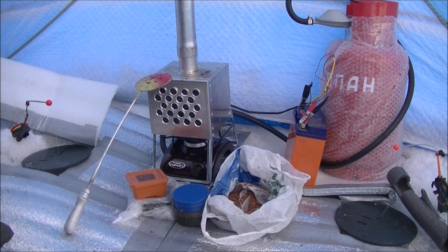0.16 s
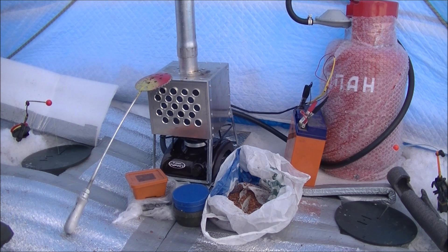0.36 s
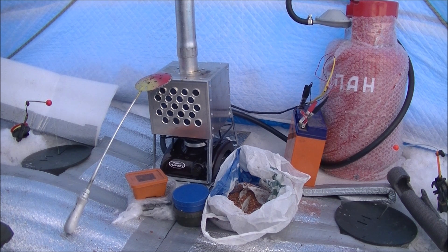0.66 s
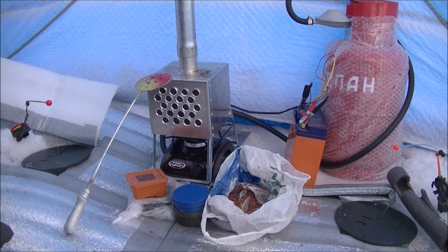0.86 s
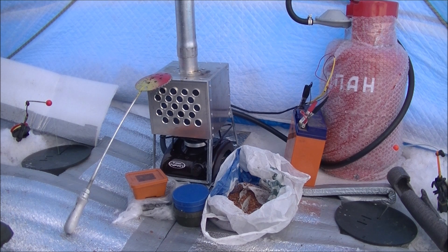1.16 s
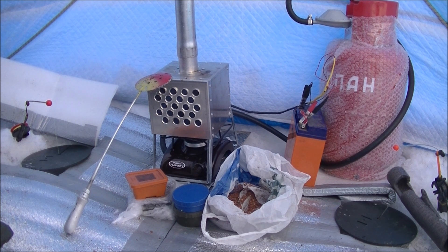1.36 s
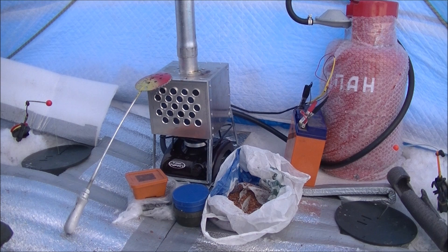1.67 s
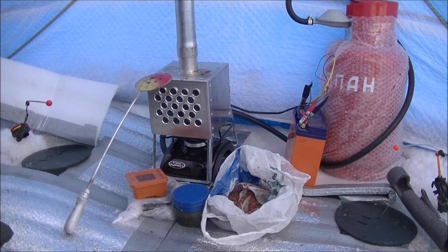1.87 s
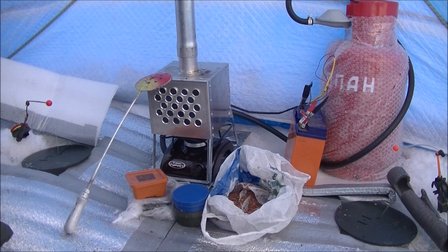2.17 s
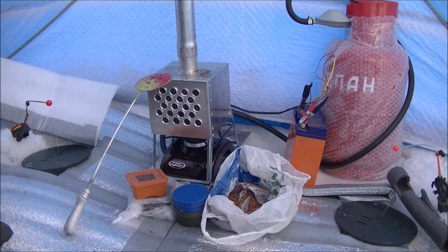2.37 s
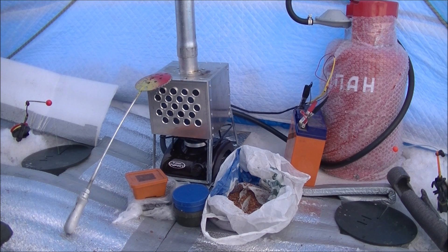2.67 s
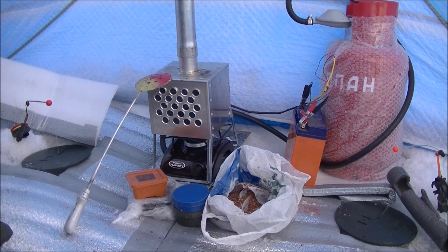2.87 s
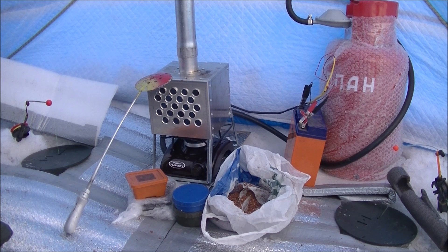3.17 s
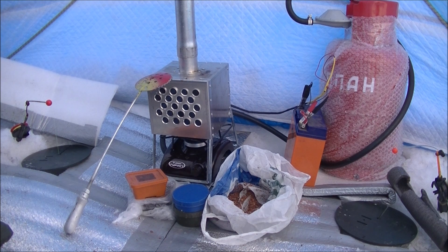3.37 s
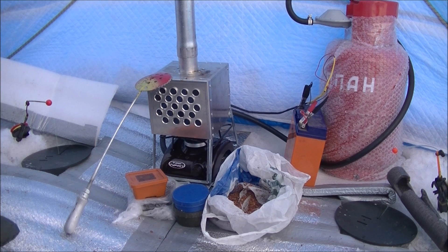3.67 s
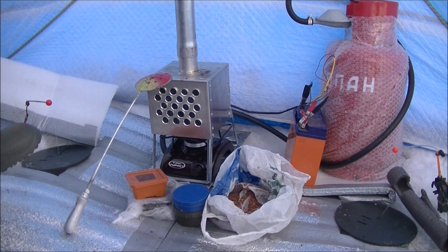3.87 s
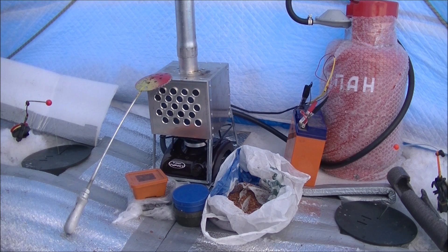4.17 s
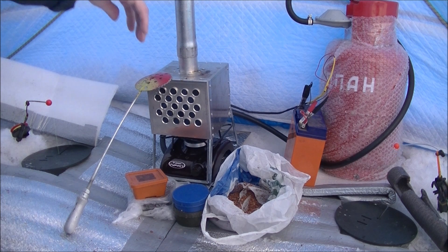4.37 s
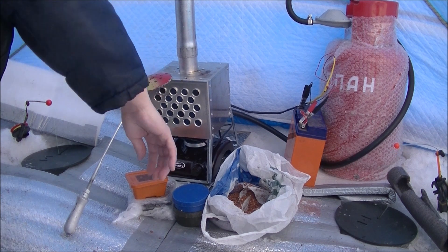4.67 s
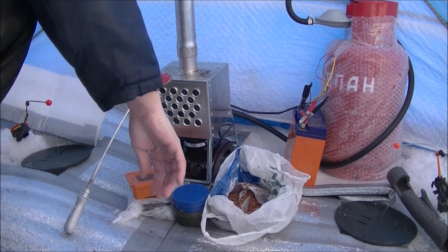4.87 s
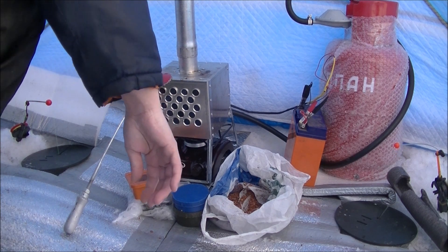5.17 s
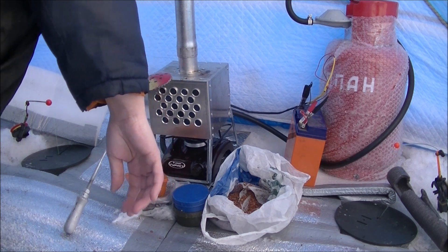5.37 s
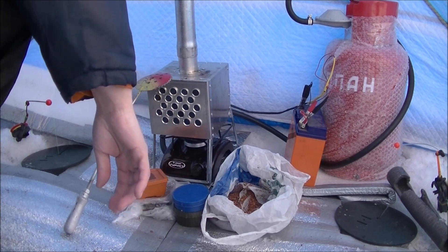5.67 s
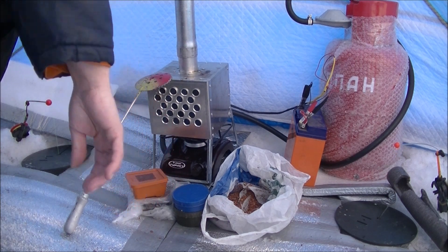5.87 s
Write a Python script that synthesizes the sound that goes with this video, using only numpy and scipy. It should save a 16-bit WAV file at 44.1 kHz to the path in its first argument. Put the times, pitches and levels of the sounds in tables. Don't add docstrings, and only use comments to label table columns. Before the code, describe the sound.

Close stereo camera microphones, very dry with a tiny diffuse tail. A faint gas hiss with a thin high whistle stays constant. Over it, slick jacket fabric rubs and ticks in quick small strokes, with a rapid little metal rattle early on and a hard snap before the middle. Then a broad sleeve movement rises, crackling, with dull low thuds on the floor mat, and fades into sparse rustles.

```python
import sys
import numpy as np
from scipy import signal
from scipy.fft import rfft, irfft
from scipy.io import wavfile
from scipy.ndimage import uniform_filter1d

SR = 44100
rng = np.random.default_rng(int(sys.argv[2]) if len(sys.argv) > 2 else 0)


def nominal_scale(level):
    x = np.asarray(level, float) / 20
    return 10 ** x


def transcribe(u):
    v = np.clip(np.atleast_2d(u).T, -1, 1)
    q = np.round(v * 32767).astype(np.int16)
    wavfile.write(sys.argv[1], SR, q)


N = 265482
TIME = np.arange(N) / SR
FRAMES = TIME[::16]

# frequency in Hz, density in dB per Hz.
NYLON = [(400, -14), (680, -23), (828, -17.5), (1200, -16.5), (1600, -10.5), (1730, -9.5), (2590, 0),
         (2880, -1), (3750, 1.5), (4380, 0.5), (5130, 0.5), (7030, -6), (9390, -4), (13700, -25),
         (15700, -16)]


def evened(x):
    return x / np.sqrt(np.mean(x ** 2) + 1e-20)


def read(points, hz):
    f, value = np.transpose(points)
    return np.interp(np.log(hz + 1), np.log(f + 1), value)


def coloured(x, points):
    gain = nominal_scale(read(points, np.fft.rfftfreq(len(x), 1 / SR)))
    return irfft(rfft(x) * gain, len(x))


def resonate(x, hz, width):
    r = np.exp(-np.pi * width / SR)
    if np.ndim(hz) == 0:
        return 2 * signal.lfilter([1 - r], [1, -r * np.exp(2j * np.pi * hz / SR)], x).real
    turn = np.exp(2j * np.pi * np.cumsum(hz) / SR)
    return 2 * (turn * signal.lfilter([1 - r], [1, -r], x / turn)).real


def band(x, lo_hz, hi_hz):
    return signal.sosfilt(signal.butter(3, [lo_hz, hi_hz], "band", fs=SR, output="sos"), x)


def add(mix, s, sound):
    part = mix[round(s * SR):][:len(sound)]
    part += sound[:len(part)]


def slips(count, per_s, spread_db):
    size = nominal_scale(spread_db * np.minimum(rng.exponential(1, count), 5))
    sign = rng.choice([-1., 1.], count)
    return evened(size * sign * (rng.random(count) < per_s / SR))


def lumps(seconds, depth_db):
    return nominal_scale(depth_db * evened(uniform_filter1d(rng.standard_normal(N), round(seconds * SR))))


def swell(s, peak_db, rise, fall, bend=0.96):
    before, after = (s - FRAMES) / max(rise, .005), (FRAMES - s) / max(fall, .005)
    return nominal_scale(peak_db - 20 * np.maximum(before, after) ** bend) ** 2


def burner():
    # frequency in Hz, density in dB per Hz.
    hiss_spectrum = [(15, -77), (25, -56), (75, -10), (189, -2.5), (228, -0.5), (380, -5.5), (652, -12.5),
                     (766, -12.5), (1240, -14.5), (1390, -10.5), (2790, -5.5), (3030, -4), (3370, 0),
                     (6440, -10.5), (15700, -16)]
    # frequency in Hz, side minus mid in dB.
    hiss_width = [(60, -3), (150, 0), (600, -3.5), (2000, -4.5), (3300, -1), (4100, -9), (4900, 0),
                  (5700, 4), (6600, -1), (7600, -1), (11000, -1.5), (15000, 0.5)]
    hiss_db = -66.5
    mid, side = (nominal_scale(hiss_db) * evened(coloured(rng.standard_normal(N), hiss_spectrum)) for _ in "ms")
    whistle = np.sin(2 * np.pi * np.cumsum(3312 * lumps(.2, .012)) / SR)
    mid = mid + nominal_scale(hiss_db - 5.5) * lumps(.3, 1.8) * whistle
    side = coloured(side, hiss_width)
    return np.array([mid + side, mid - side]) * lumps(0.043, 0.42)


def motion():
    # time in seconds, level in dB, tautness from -1 slack to 1 tight.
    drag = [(0, -64, -0.037), (.5, -66.5, -0.61), (.62, -61, 0), (.97, -63.5, -0.027), (1.3, -60, 0.15),
            (1.55, -62, 0.67), (1.72, -57.5, 0.27), (2.03, -62.5, -0.31), (2.34, -66.5, 0.11),
            (2.62, -88, 0), (2.87, -63.5, -0.011), (3.39, -71.5, 0.14), (3.48, -55, -0.071),
            (4.25, -47, -0.063), (5.0, -54.5, 0.42), (5.74, -62.5, 0.12), (5.9, -54.5, -0.053),
            (6.02, -55.5, -0.097)]
    # peak in seconds, peak in dB, rise in seconds, fall in seconds, tautness.
    fidgets = [(1.05, -51.5, 0.2, 0.2, 0.3), (1.2, -54, 0.33, 0.19, -.3), (1.4, -54, 0.067, 0.16, -0.7),
               (1.889, -43, 0.088, 0.069, 0.35), (1.83, -52, 0.053, 0.17, 0.31),
               (1.92, -53, 0.18, 0.028, .3), (2.205, -52.5, .15, 0.088, 0.26),
               (2.682, -54.5, 0.027, 0.13, 0.6), (2.74, -53.5, 0.14, .05, .5),
               (2.165, -43, 0.044, 0.095, 0.39), (2.425, -51, 0.015, 0.31, 0.0057),
               (2.483, -49.5, 0.092, 0.044, -0.24), (2.7, -48.5, 0.042, 0.14, 0.73),
               (2.781, -51, 0.11, 0.026, -1.3), (2.98, -50.5, 0.024, 0.14, 0.46),
               (3.04, -54.5, 0.17, 0.031, 0.12), (3.108, -58, 0.053, .17, -0.99)]
    # peak in seconds, peak in dB, rise in seconds, fall in seconds, tautness.
    reaches = [(3.66, -44.5, 0.027, 0.45, -0.35), (3.792, -39.5, 0.23, 0.26, 0.56),
               (3.88, -45.5, 0.18, 0.32, -0.58), (4.04, -41, 0.15, 0.086, 1),
               (4.12, -34, 0.25, 0.015, 0.47), (4.33, -37, 0.03, 0.11, -0.2),
               (4.415, -42.5, 0.15, 0.22, -0.3), (4.48, -40.5, 0.22, 0.34, 0.29), (4.3, -44, .03, .2, .3),
               (4.58, -47, .15, 0.14, 0.075), (4.67, -44, 0.076, 0.68, -0.43),
               (4.85, -41, 0.39, 0.32, 0.22), (5.0, -48.5, 0.22, 0.15, 0.0036),
               (5.055, -51, 0.3, 0.056, 0.2), (5.16, -59.5, 0.1, 0.15, 0.5), (5.3, -51.5, 0.09, 0.14, 0.1),
               (5.39, -53.5, .05, .2, .3), (5.5, -53, 0.17, .08, .3), (5.45, -48.5, 0.21, .25, 0.47),
               (5.63, -56, 0.22, .1, 0.25), (6.03, -46, .08, .1, 0.066)]
    s, level_db, taut = np.transpose(drag)
    power = nominal_scale(np.interp(FRAMES, s, level_db)) ** 2
    pull = power * np.interp(FRAMES, s, taut)
    for *push, tight in [*fidgets, *reaches]:
        stroke = swell(*push)
        power, pull = power + stroke, pull + tight * stroke
    return np.interp(TIME, FRAMES, np.sqrt(power)), np.interp(TIME, FRAMES, pull / power)


def crackle(count=8):
    out, u = np.zeros(N), TIME[:200]
    for hz in np.geomspace(2000, 7000, count):
        pop = np.exp(-u * hz / 0.91) * np.minimum(u * hz, 1) * np.sin(2 * np.pi * hz * u)
        pops = signal.oaconvolve(slips(N, 90, 2.7), pop / np.linalg.norm(pop))[:N]
        out += nominal_scale(read(NYLON, hz)) * pops
    return evened(out)


def rubbing():
    # start in seconds, end in seconds, frequency in Hz, width in Hz, level in dB.
    singing = [(3.7, 3.78, 2450, 370, -46), (3.78, 3.85, 2530, 370, -46.5), (3.71, 3.84, 3850, 600, -42),
               (5.135, 5.2, 4950, 450, -50.5), (5.38, 5.54, 4900, 590, -48.5), (5.38, 5.52, 7600, 410, -61),
               (4.0, 4.1, 940, 490, -55.5), (4.0, 4.125, 9300, 790, -47.5), (4.325, 4.37, 2800, 700, -44),
               (4.395, 4.43, 1900, 600, -52), (1.5, 1.76, 13500, 3000, -72), (4.04, 4.13, 4670, 910, -43.5),
               (1.85, 1.93, 2750, 410, -54), (1.86, 1.91, 4300, 820, -46.5), (3.0, 3.058, 2950, 320, -59),
               (3.1, 3.145, 2900, 400, -61), (2.15, 2.22, 4660, 800, -50), (3.862, 3.892, 9000, 1300, -46),
               (4.56, 4.61, 3600, 540, -53), (5.55, 5.64, 4750, 700, -58), (2.675, 2.725, 4900, 800, -57)]
    level, taut = motion()
    sheen_db, fold_db = -11.5 + 5 * taut, -15 - 8 * taut
    patch_hz, lining_db = 4230 + 600 * taut, -1.5 - 3.5 * taut

    cloth = coloured(slips(N, 9000, 0.75) * lumps(.004, 0.16) * lumps(0.031, 1.38), NYLON)
    body = band(cloth, 1900, 7200)
    body = evened(evened(body) + 2.4 * evened(resonate(body, patch_hz, 1740)))
    lining = resonate(band(body, 1500, 3000), 2400, 1100)
    body = body + (nominal_scale(lining_db) * lumps(.04, 2.2) - 1) * lining
    sheen = band(cloth, 7000, 15900)
    sheen = nominal_scale(sheen_db) * evened(evened(sheen) + 0.23 * evened(resonate(sheen, 9460, 860)))
    fold = nominal_scale(fold_db) * evened(band(cloth, 550, 1900))
    out = level * (body + sheen + fold + nominal_scale(-10.5) * crackle())

    for start, end, hz, width, db in singing:
        drive = slips(round((end - start) * SR), 6300, 0.7)
        tone = evened(resonate(resonate(drive, hz, width), hz, 2 * width))
        add(out, start, nominal_scale(db) * signal.windows.tukey(len(drive), .6) * tone)
    return out


def snaps():
    # start in
    # seconds, peak in dB, centre in Hz, low part in dB, sheen in dB.
    creases = [(.0206, -42.5, 3600, -30, -20), (1.0608, -25, 3800, -43, -15), (1.0668, -25, 4100, -40, -14),
               (1.1817, -27, 3600, -22, -19), (1.186, -26, 4200, -22, -22), (1.197, -29, 4200, -25, -25),
               (1.191, -25, 4000, -43, -23), (1.3775, -23, 2500, -17, -21), (1.385, -24, 2760, -43, -22),
               (1.8696, -29, 4860, -33, -23), (1.8847, -29, 4100, -34, -17),
               (2.1103, -31.5, 3300, -17, -28), (2.14, -37, 4610, -34, -24), (2.1625, -36, 4410, -26, -24),
               (2.408, -16.5, 3900, -20, -22), (2.469, -32, 2220, -18, -11.5),
               (2.4744, -47, 3750, -22, -20), (1.153, -28, 4600, -49, -10), (2.7056, -38, 4800, -10.5, -20),
               (2.7688, -29.5, 2860, -20, -37), (2.9706, -38, 2970, -21, -19),
               (3.1005, -38, 2850, -12.5, -26)]
    # start in seconds, peak in dB, centre in Hz, low part in dB, sheen in dB.
    sleeve = [(3.6476, -28, 3900, -10.5, -25), (3.8764, -22, 4070, -21, -5), (3.8825, -20, 5100, -21, -9),
              (4.2835, -30, 4630, -13, -20), (4.3258, -23, 4630, -28, -15), (4.332, -17.5, 2680, -36, -30),
              (4.4814, -24, 4370, -37, -23), (4.738, -24.5, 3870, -17, -11), (4.838, -19, 5030, -32, -12),
              (4.8744, -23.5, 4540, -18.5, -26), (4.892, -24, 4800, -19, -23),
              (5.2914, -43, 4080, -25, -10)]
    # start in seconds, peak
    # in dB, centre in Hz, low part in dB, sheen in dB.
    seams = [(.0154, -25, 3620, -33, -10), (.1214, -35.5, 3300, -22, -27), (.2194, -43, 4630, -18, -17),
             (.3088, -35, 5700, -24, -12), (1.1184, -45, 3100, -28, 0), (1.16, -25, 4130, -47, -6),
             (1.3394, -45, 2830, -19, -6), (1.9044, -26, 3940, -39, -23), (2.0946, -37, 3650, -15, -26),
             (2.1734, -24, 4370, -17, -26), (2.2677, -49, 3970, -22, -24),
             (2.4044, -21.5, 4440, -17.5, -13.5), (2.4154, -17.5, 3570, -46, -37),
             (2.9654, -34, 4110, -15, -18), (1.8495, -36, 2800, -16, -25), (2.1003, -39, 3600, -27, -25),
             (2.1263, -42, 3180, -22, -25), (2.2465, -45, 5200, -30, -15), (2.7732, -30, 3300, -20, -30),
             (2.777, -36, 3300, -20, -30), (4.2045, -33, 2200, -5, -25), (4.2448, -33, 4200, -7.5, -25),
             (4.302, -30, 5500, -30, -3), (4.3565, -28, 2500, -13, -25), (4.405, -31, 2400, -11, -18),
             (4.65, -36, 2300, -12, -25), (4.6775, -30.5, 3500, -8.5, -25), (4.7195, -33, 2400, -8, -25),
             (5.1235, -38, 2200, -9, -25), (5.9074, -37, 3400, -19, -20), (3.8878, -24, 5600, -30, -14),
             (4.0487, -27, 4500, -25, -14), (4.0615, -24, 4600, -25, -14), (4.0905, -22, 4500, -25, -14),
             (3.6726, -25, 2400, -23, -24), (3.7444, -24, 3670, -40, -27), (3.9365, -25, 4200, -24, -18)]
    out, t = np.zeros(N), TIME[:3000]
    for rows, t60, tick in ((creases, .055, 4.0), (sleeve, .048, 4.0), (seams, .02, 8.0)):
        fall = nominal_scale(-60 * t / t60) * np.minimum(t / 0.00039, 1)
        for s, peak_db, hz, low_db, sheen_db in rows:
            drive = slips(len(t), 14000, 1.2) + tick * signal.unit_impulse(len(t), idx=16)
            cloth = coloured(drive, NYLON)
            crack = evened(band(cloth, .5 * hz, 6100)) + 0.72 * evened(resonate(cloth, hz, 450))
            low = nominal_scale(low_db + 4) * evened(band(drive, 880, 2400))
            sheen = nominal_scale(sheen_db) * evened(band(cloth, 7000, 15900))
            add(out, s, nominal_scale(peak_db - 10 - .55 * tick) * fall * (evened(crack) + low + sheen))
    return out


def rings():
    # start in
    # seconds, length in seconds, frequency in Hz, level in dB, t60 in seconds.
    free_tones = [(1.18, .198, 2832, -53.5, .9), (1.195, .03, 4242, -46, .1), (2.012, .072, 1950, -66, 1.5),
                  (1.972, .032, 1900, -55, .14), (1.915, .055, 3400, -61, .5), (2.268, .008, 3750, -43, .015),
                  (4.19, .09, 420, -62, 1.5), (1.183, .04, 1180, -48, .11), (.99, .2, 88, -61, .6),
                  (3.88, .11, 76, -63, .9), (4.47, .07, 112, -58, .4), (4.59, .08, 62, -67, .6),
                  (4.282, .025, 320, -52, .09), (4.471, .03, 320, -50, .09),
                  (.0156, .03, 3650, -45.5, 0.072), (.0156, .03, 3840, -48, 0.09),
              (.0158, 0.028, 3180, -51, .08), (.0156, .012, 6100, -48, 0.021),
              (.0158, .022, 5900, -47.5, 0.056), (0.017, .015, 6700, -55, 0.046),
              (1.3785, .018, 560, -56, .05), (2.45, .03, 480, -57, .15), (2.47, .02, 330, -60, .1),
              (2.745, .03, 520, -62, .12), (1.2395, .006, 4250, -43, .03), (4.205, .05, 810, -69, 1.0),
              (4.842, 0.034, 560, -48, .09), (4.889, .025, 520, -49, 0.072), (4.889, .03, 310, -51, .1),
              (4.326, .025, 558, -57, .08), (3.083, .014, 550, -61, .08), (3.101, .016, 550, -57, 0.066),
              (3.123, .014, 550, -57, .06), (3.148, .014, 540, -65, .07), (1.872, .03, 560, -62, 0.13),
              (4.7, 0.02, 340, -59, .1), (3.674, 0.021, 340, -55, .1)]
    out = np.zeros(N)
    for s, length, hz, db, t60 in free_tones:
        u = TIME[:round(length * SR)]
        edges = np.minimum(np.minimum(u, length - u) * hz / 2, 1)
        add(out, s, nominal_scale(db - 60 * u / t60) * edges * np.sin(2 * np.pi * hz * u))
    return out


def weight():
    # frequency in Hz, width in Hz, level in dB.
    padding = [(236, 44, -31), (318, 166, 4), (438, 100, -33)]
    pocket = [(464, 90, -1.5), (551, 90, 4), (700, 390, -21)]
    mat = [(59.7, 35, -7), (87.6, 13, 0), (111, 54, -3.5)]
    # peak in seconds, peak in dB, length in seconds.
    padding_presses = [(1.006, -70.5, 0.054), (1.18, -74, 0.078), (1.383, -69.5, 0.022), (2.185, -70, 0.08),
                       (2.46, -64.5, 0.09), (2.761, -64, 0.029), (3.12, -78, .08), (3.685, -58.5, 0.038),
                       (3.881, -64, 0.042), (4.067, -58, 0.055), (4.292, -57.5, 0.062), (4.34, -67, 0.12),
                       (4.483, -60.5, 0.075), (4.606, -64, 0.034), (4.723, -61, 0.069), (4.86, -61, 0.11),
                       (4.93, -62, .04), (4.417, -65, .04), (5.041, -70, 0.034)]
    pocket_presses = [(1.385, -69, 0.011), (1.87, -70.5, 0.11), (2.15, -69.5, 0.1), (2.415, -61, 0.023),
                      (2.46, -60, 0.034), (2.53, -66.5, 0.02), (2.75, -66, 0.06), (2.975, -69, 0.021),
                      (3.12, -69, .06), (3.7, -73.5, 0.092), (3.92, -72.5, 0.096), (4.06, -69, 0.12),
                      (4.25, -65, 0.05), (4.34, -62, 0.026), (4.6, -71, 0.043), (4.86, -64, 0.04),
                      (4.92, -62, 0.037), (4.72, -65, .04)]
    mat_presses = [(1.02, -63.5, 0.11), (1.15, -85, .2), (1.37, -83, .08), (3.73, -73.5, 0.19),
                   (3.92, -81, .1), (4.06, -70, 0.04), (4.21, -66, 0.18), (4.34, -67, 0.19),
                   (4.5, -62, 0.13), (4.57, -73, .1), (4.66, -66, .15), (4.78, -70, 0.13), (4.9, -68, .2)]
    # idle level in dB, rise as a share of the length, roundness of the press.
    idle_db = (-83, -92, -88)
    rise_share = (0.98, 1, 0.42)
    roundness = (1.22, 1.64, 1.1)
    out = np.zeros(N)
    hollows = (padding, pocket, mat), (padding_presses, pocket_presses, mat_presses)
    for modes, presses, rest_db, rise, bend in zip(*hollows, idle_db, rise_share, roundness):
        power = nominal_scale(rest_db) ** 2
        for s, db, length in presses:
            power = power + swell(s, db, rise * length, length, bend)
        knead = slips(N, 700, 2.6)
        sound = np.zeros(N)
        for k, (hz, width, db) in enumerate(modes):
            sound += (-1) ** k * nominal_scale(db) * resonate(resonate(knead, hz, width), hz, 1.52 * width)
        out += np.interp(TIME, FRAMES, np.sqrt(power)) * evened(band(sound, 42, 2000))
    return out


def metal():
    # start in seconds, length in seconds, peak in dB,
    # low tone in Hz, kick to the high modes in dB.
    contacts = [
        (1.1476, .0042, -19.5, 3165, -44),
        (1.1495, .001, -60, 3000, -33),
        (1.1517, .002, -24, 2900, -28),
        (1.1545, .0045, -24, 2950, -26),
        (1.159, .0038, -26, 3100, -25),
        (1.1625, .0028, -25, 3150, -26),
        (1.165, .0022, -31, 3000, -36),
        (1.1672, .0052, -25, 2820, -40),
        (1.1725, .006, -39, 2950, -40),
        (1.179, .005, -37, 2900, -44),
    ]
    # frequency in Hz, level in dB, t60 in seconds.
    high_modes = [(2700, -8, .015), (4010, -12, .015), (5550, -8, .02), (5635, -1, .03), (6400, -13, .012),
                  (9800, -11, .014)]
    out, t = np.zeros(N), TIME[:3000]
    for s, length, peak_db, low_hz, kick_db in contacts:
        u = TIME[:round(length * SR)]
        add(out, s, nominal_scale(peak_db) * np.sin(np.pi * (u / length) ** 1.5) * np.sin(2 * np.pi * low_hz * u))
        for (hz, db, t60), phase in zip(high_modes, rng.random(len(high_modes))):
            fall = nominal_scale(kick_db + db - 60 * t / t60) * np.minimum(t / 0.00043, 1)
            add(out, s, fall * np.sin(2 * np.pi * (hz * t + phase)))
    return out


def tent(x, t60=0.017, late_db=-10, turn_hz=2.3):
    t = TIME[:4000]
    tails = rng.standard_normal((2, 4000)) * nominal_scale(-60 * t / t60) * (t > .002)
    turn = 2 * np.pi * turn_hz * TIME
    late = np.zeros(N)
    for weighting, tail in zip((np.cos(turn), np.sin(turn)), tails):
        late += signal.oaconvolve(x * weighting, tail / np.linalg.norm(tail))[:N]
    return x + nominal_scale(late_db) * late


def ports(mid):
    # frequency in Hz, side minus mid in dB.
    port_width = [(60, -28), (150, -20), (600, -30), (1200, -27), (2000, -19), (2700, -12), (3300, -10.5),
                  (4100, -14), (4900, -10), (5700, -4), (6600, -3.5), (8800, -5), (10200, -2), (13000, 6.5)]
    # frequency in Hz, share of the side that follows the mid.
    side_lean = [(2000, .05), (3000, .2), (4100, -.05), (5700, .3), (6600, .2), (7600, -.15), (8800, -.66),
                 (10200, -.62), (11500, -.25), (13000, 0)]
    hz = np.fft.rfftfreq(N, 1 / SR)
    scatter = rfft(rng.standard_normal(300) * nominal_scale(-60 * TIME[:300] / 0.017), N)
    lean = np.clip(read(side_lean, hz), -1, 1)
    shaped = rfft(mid) * nominal_scale(read(port_width, hz))
    loose = shaped * np.sqrt(1 - lean ** 2) * scatter / abs(scatter)
    wander = 2.2 * evened(uniform_filter1d(uniform_filter1d(rng.standard_normal(N), 400), 200))
    side = irfft(shaped * lean, N) + np.cos(wander) * irfft(loose, N) + np.sin(wander) * irfft(1j * loose, N)
    return np.array([mid + side, mid - side])


def scene():
    in_tent = tent(rubbing() + snaps() + metal() + weight())
    return ports(in_tent + rings()) + burner()


def top_cut(x):
    return signal.sosfilt(signal.butter(12, 15810, fs=SR, output="sos"), x)


def record(dry):
    lowpass = signal.firwin(801, 15720, window=("kaiser", 9), fs=SR)
    limited = signal.oaconvolve(dry, lowpass[None], "same")
    return top_cut(limited)


dry = scene()
out = record(dry)
transcribe(out)
```